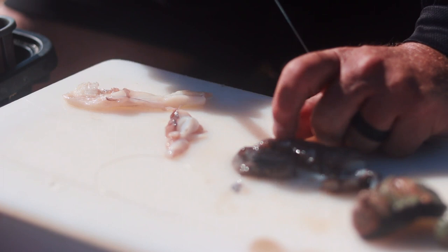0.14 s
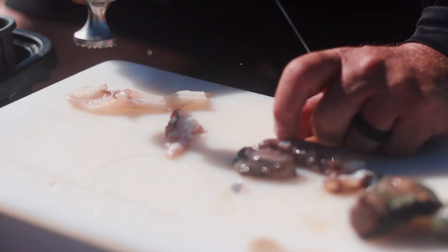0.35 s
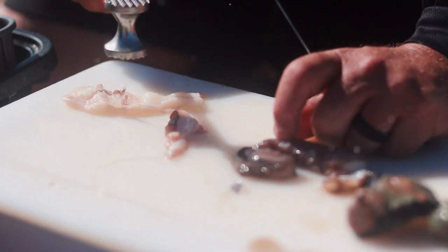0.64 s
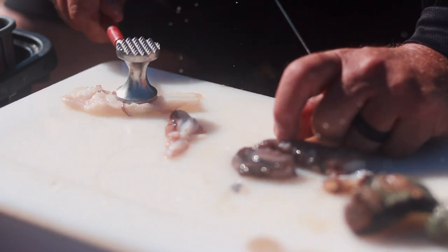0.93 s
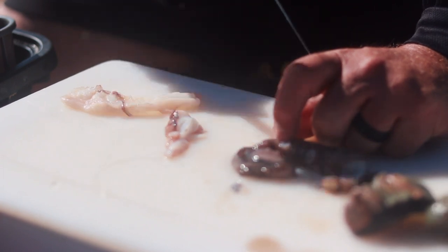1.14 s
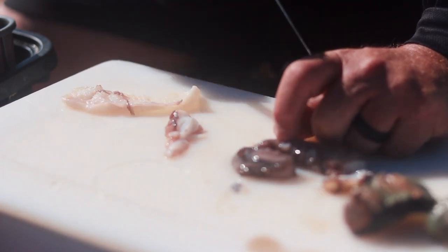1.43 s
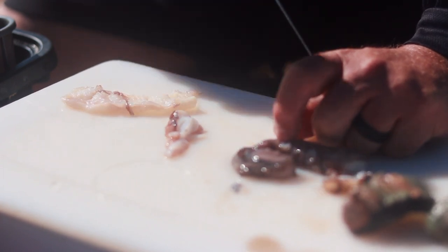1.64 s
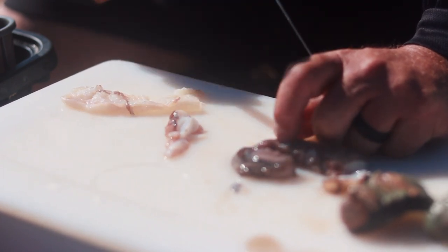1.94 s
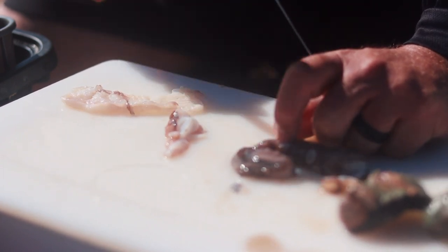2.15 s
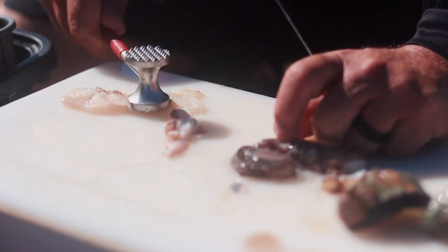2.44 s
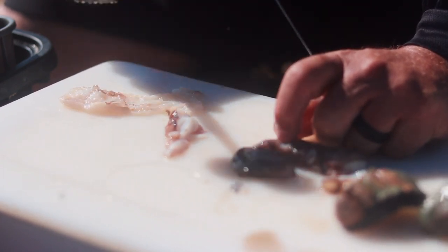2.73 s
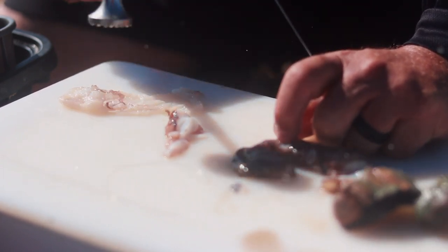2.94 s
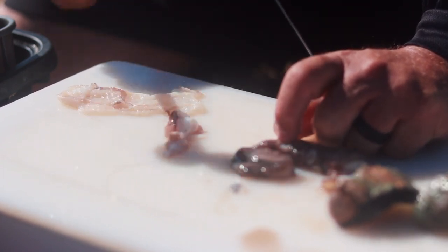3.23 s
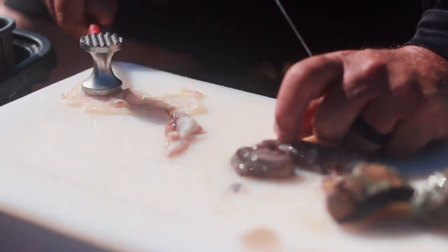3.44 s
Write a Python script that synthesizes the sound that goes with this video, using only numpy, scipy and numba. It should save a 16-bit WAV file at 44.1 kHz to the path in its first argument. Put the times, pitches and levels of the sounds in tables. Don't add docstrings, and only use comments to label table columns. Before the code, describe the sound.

A metal mallet raps wet bait on a plastic board in quick, sharp knocks amid buffeting wind

```python
import sys
import numpy as np
from scipy import signal
from scipy.io import wavfile
from scipy.ndimage import uniform_filter1d
from numba import njit

SR = 44100
rng = np.random.default_rng(int(sys.argv[2]) if len(sys.argv) > 2 else 0)


def persist_wave(psi):
    counts = np.round(np.clip(psi, -1, 1) * 32767).astype(np.int16)
    wavfile.write(sys.argv[1], SR, np.atleast_2d(counts).T)


def field_ratio(decibels):
    return 10 ** (np.asarray(decibels, dtype=float) / 20)


N = 158760


def band(x, hz, width):
    return signal.lfilter(*signal.iirpeak(hz, hz / width, fs=SR), x)


def lowcut(x, hz, order):
    return signal.sosfilt(signal.butter(order, hz, "high", fs=SR, output="sos"), x)


def unit(x):
    return x / np.sqrt(np.mean(x ** 2))


def walk(rate):
    k = int(SR / rate)
    held = np.repeat(rng.standard_normal(N // k + 1), k)
    return 0.72 * uniform_filter1d(uniform_filter1d(held, k), k)[:N]


def ring(modes, luck, t):
    spot_db, spot_detune = 1.5, 0.04
    hz, left, right, t60 = np.array(modes).T[:, :, None]
    size = field_ratio(np.array([left, right]) + spot_db * luck[:len(hz), None])
    pitch_hz = hz * (1 + spot_detune * luck[-len(hz):, None])
    wave = np.sin(2 * np.pi * pitch_hz * t) * np.exp(-np.log(1000) * t / t60)
    return (size * wave).sum(axis=1) / np.sqrt(len(hz))


def excite(modes, force):
    return signal.fftconvolve(modes, force[None], axes=1)[:, :modes.shape[1]]


def scrape(noise, length_s, t):
    return noise * t / length_s * np.exp(-t / length_s) / np.sqrt(length_s * SR / 4)


def add(out, sound, s):
    i = int(s * SR)
    out[..., i:i + sound.shape[-1]] += sound[..., :N - i]


def teeth_ticks(out, t):
    # start_s, head_db, board_db, board_tilt_db per octave
    landings = [(0.2344, 6, 5, -1), (0.2364, 9.5, 7.5, 5.5), (0.5621, 4, -2, -11), (.5636, 6.5, 8, 7),
                (0.8864, 8, 8.5, 7.5), (0.8883, 15.5, 8, -9.1), (1.2022, -25, -21, 14),
                (1.2035, -2, -9, -6), (1.205, 4.5, 2.5, -1), (1.2068, -14, 0.5, -16.5),
                (1.5035, -4.5, -13.5, -4), (1.505, -14, -5, -17), (1.508, -19, -1, -10),
                (1.7499, 4, -1.5, 4.5), (1.7513, -5, -2, -4), (1.7537, -5.5, -4.5, -11),
                (1.9905, -29, -7, -11.5), (1.9921, 3, -4.5, 8), (1.996, 2.5, -2, 5),
                (1.9958, -8, 5.5, -1.5), (2.2074, 3.5, 6.5, 5), (2.211, -1, 2.5, -2.5),
                (2.2117, -4, 8.5, -3.5), (2.4259, 1, 0.5, 1.5), (2.428, 4.5, 8.5, 5.5), (2.4305, 1, 4, .1),
                (2.6327, 7, 4.5, -3.3), (2.6344, 12.5, 15.5, 0), (2.8413, 11.5, 6, -4),
                (2.8423, 0.5, 9, 2.5), (2.8441, 3.5, 6, 0), (3.0485, 0, 3.5, 0.5),
                (3.0508, 20.5, 2.5, -8.5), (3.2588, -9, -17, 12), (3.2602, 12.5, 12.5, 5.5),
                (3.4639, -7, -2, 0), (3.4658, 10.5, 12.5, 2)]
    # pitch_hz, left_db, right_db, t60_s
    head_modes = [(6960, -24.5, -8, 0.0041), (7660, -2.5, 7.5, 0.0062), (8415, -1, 1, 0.0053),
                  (9660, 2.5, -1, 0.0053), (10930, -3.5, 0.5, 0.0065), (12300, -16.5, -12, 0.0022),
                  (14600, -24.5, -18.5, .003)]
    # pitch_hz, left_db, right_db, t60_s
    board_modes = [(849, -4, -5.5, 0.041), (1032, -7, -4, 0.053), (1292, -10.5, -6, 0.047),
                   (1443, -0.5, 0, 0.037), (1630, -18.5, -6.5, 0.037), (1972, -19.5, 0.5, 0.023),
                   (2224, -4.5, 2, 0.028), (2487, -6.5, -1, 0.019), (2810, -13, 3, 0.021),
                   (3140, -7.5, 0, 0.016), (3455, -13, -4, 0.02), (4050, -27, -13, 0.014),
                   (4390, -29.5, -14.5, 0.025)]
    tick_s, grind_s, grind_db = 0.00018, 0.0014, -12
    squash_s = 0.00025
    port_lag = 1
    luck = rng.standard_normal((len(landings), 2, 28))
    grit = rng.standard_normal((len(landings), 3, len(t)))
    for (s, head_db, board_db, tilt_db), a, g in zip(landings, luck, grit):
        head = ring(head_modes, 1.05 * a[0], t)
        head = np.array([head[0], np.roll(head[1], port_lag)])
        teeth = scrape(g[0], tick_s, t) + field_ratio(grind_db) * scrape(g[1], grind_s, t)
        tilted = []
        for hz, left, right, t60 in board_modes:
            tilt = tilt_db * np.log2(hz / 2000)
            tilted.append((hz, left + tilt, right + tilt, t60))
        board = excite(ring(tilted, a[1], t), scrape(g[2], squash_s, t))
        add(out, field_ratio(head_db) * excite(head, teeth) + field_ratio(board_db) * board, s)


def thuds_and_slaps(out, t):
    # start_s, thud_db, slap_db
    blows = [(0.2339, -6, -2.5), (0.5623, 1.5, -8), (0.8863, 1.5, 5), (1.2018, -2, -6), (1.5023, -1, -12),
             (1.7504, 2.5, -6.5), (1.9921, 1, 1), (2.208, -5.5, -3), (2.4252, -3, -5), (2.6333, -4.5, 1.5),
             (2.8407, -0.5, 2), (3.0501, -1, 5.5), (3.2593, 1, -1.5), (3.4652, -15.5, -6)]
    # pitch_hz, left_db, right_db, t60_s
    thud_modes = [(370, -8, -7, 0.086), (448.8, -0.5, -3.5, 0.1), (226, -24.5, -34, 0.014),
                  (640, -6.5, -5.5, 0.083)]
    push_s = 0.0012
    rebound_s, slap_t60_s, slap_hz, slap_width_hz = 0.0017, 0.024, 1430, 1500
    spot = rng.standard_normal((len(blows), 8))
    wet = rng.standard_normal((len(blows), 3, len(t)))
    push = np.sin(np.pi * np.clip(t / push_s, 0, 1)) * np.pi / (push_s * SR)
    slap_shape = 2 * np.minimum(t / rebound_s, 1) * np.exp(-np.log(1000) * t / slap_t60_s)
    for (s, thud_db, slap_db), a, g in zip(blows, spot, wet):
        add(out, field_ratio(thud_db) * excite(ring(thud_modes, 0.28 * a, t), push), s)
        noise = g[0] + 1.1 * g[1:]
        slap = band(band(noise, slap_hz, slap_width_hz), slap_hz, 2 * slap_width_hz)
        add(out, field_ratio(slap_db) * slap * slap_shape, s)


def mallet():
    out, t = np.zeros((2, N)), np.arange(4096) / SR
    teeth_ticks(out, t)
    thuds_and_slaps(out, t)
    return lowcut(out, 150, order=2)


def buffet(gusts, pops):
    # pitch_hz, width_hz, level_db
    port_modes = [(117.6, 310, -19.5), (251, 208, -5.5), (363, 210, -3.5), (597, 450, -16),
                  (1135, 230, -13), (2100, 730, -36.5)]
    calm_db, eddies_per_s, eddy_spread_db = -36, 420, 3.5
    pop_db, pop_cycles = -3, 1.29
    t, out = np.arange(N) / SR, 0
    power = field_ratio(2 * calm_db)
    for s, length, db in gusts:
        power = power + field_ratio(2 * db) * np.exp(-(2 * (t - s) / length) ** 2)
    arrivals = rng.random(N) < eddies_per_s / SR
    strength = field_ratio(eddy_spread_db * np.minimum(rng.exponential(size=N), 2.6))
    hits = arrivals * strength * rng.choice([-1, 1], size=N)
    for hz, width, db in port_modes:
        own = hits * field_ratio(1.8 * rng.standard_normal(N))
        out = out + field_ratio(db) * unit(band(band(own, hz, width), hz, 1.51 * width))
    out = unit(out) * np.sqrt(power)
    u = (np.arange(2048) - 1024) / SR
    for s, db, hz in pops:
        pulse = np.cos(2 * np.pi * hz * u) * np.exp(-(2 * u * hz / pop_cycles) ** 2)
        add(out, -field_ratio(db + pop_db) * pulse, s + u[0])
    return out


def wind():
    # centre_s, length_s, level_db
    gusts_left = [(.07, 0.045, -27.5), (.2, 0.079, -23.5), (.45, 0.12, -42), (.53, 0.13, -24),
                  (.78, 0.28, -28.5), (1.1, 0.14, -59), (1.6, 0.3, -27.5), (1.73, 0.048, -25.5),
                  (1.86, 0.053, -35), (2.05, 0.078, -24), (2.3, 0.087, -26), (2.67, 0.031, -20),
                  (2.9, 0.037, -20), (3.1, .06, -37), (3.34, 0.037, -24.5), (3.58, 0.051, -21)]
    gusts_right = [(.025, 0.05, -24.5), (.17, 0.11, -29), (.41, 0.017, -29.5), (.53, 0.078, -19.5),
                   (.71, 0.014, -25), (.8, 0.038, -12.5), (.86, 0.25, -15.5), (.96, 0.018, -34),
                   (1.03, 0.011, -11), (1.17, 0.05, -25.5), (1.35, 0.074, -27.5), (1.62, 0.058, -25),
                   (1.72, 0.041, -17.5), (1.8, 0.14, -19.5), (1.94, 0.059, -16.5), (2.06, 0.08, -13.5),
                   (2.17, 0.034, -17.5), (2.27, 0.067, -24.5), (2.37, 0.11, -26), (2.47, 0.048, -15),
                   (2.59, 0.14, -28), (2.74, 0.12, -15.5), (2.92, 0.077, -13), (3.16, 0.046, -14.5),
                   (3.35, 0.073, -18.5), (3.57, 0.2, -24.5)]
    # centre_s, peak_db,
    # pitch_hz
    pops_left = [(1.457, -19.5, 111), (1.516, -6, 600), (1.467, -7.5, 320), (1.7383, -9, 423),
                 (2.016, -4, 566), (2.2523, -5, 420), (2.7939, -13, 510), (2.8849, -12, 542),
                 (2.9075, -12, 454), (3.073, -3, 560), (3.1274, -5, 370), (3.4854, 2.5, 544),
                 (3.554, -8, 434), (3.5965, -3, 580)]
    pops_right = [(0.48, -10, 322), (0.4881, -8, 254), (0.5206, -17, 410), (0.525, -7, 520),
                  (0.5355, -1.5, 390), (0.543, -2.5, 790), (0.554, -6, 410), (0.514, -19, 101),
                  (1.516, -4, 600), (.764, -10, 395), (1.547, -2.5, 690), (1.926, -9, 585),
                  (1.945, -8, 560), (1.977, -5.5, 800), (0.7877, 0, 620), (0.8016, -2.5, 410),
                  (0.813, -7, 428), (0.823, -6, 544), (0.834, 0.5, 1000), (1.708, -11, 400),
                  (1.7767, 2.5, 495), (1.7853, -6, 500), (1.9193, -2, 820), (1.9388, -3, 790),
                  (1.958, -7, 536), (1.9848, -4, 483), (2.038, -3, 630), (2.0621, 5.5, 483),
                  (2.0743, 1.5, 600), (2.0929, -2.5, 730), (2.47, 1, 543), (2.7281, -3, 636),
                  (2.894, 1, 656), (2.9334, 1, 510), (3.1396, 1, 1094), (3.1668, 4.5, 515),
                  (3.1777, 1, 510), (3.248, -4.5, 1170)]
    ports = np.array([buffet(gusts_left, pops_left), buffet(gusts_right, pops_right)])
    return ports + 0.15 * ports[::-1]


def harbour():
    # pitch_hz, level_db per Hz
    spectrum = np.array([(60, -6.5), (300, 2), (600, 4), (1400, 0.5), (3000, -6.5), (4600, -20.5),
                         (10000, -14), (16000, -50)])
    alike_hz, treble_pan_db = 940, -4
    out = 0
    for hz in 60 * 2 ** np.arange(0, 8.2, 0.5):
        noise = rng.standard_normal((2, N))
        mid, side = band(band(noise, hz, hz / 1.56), hz, hz / 1.54)
        db = np.interp(np.log(hz), np.log(spectrum[:, 0]), spectrum[:, 1]) + 0.65 * walk(8.6)
        wide = min(hz / alike_hz, 1.2)
        pan = field_ratio(treble_pan_db * min(hz / 5300, 2) * np.array([[0.5], [-0.5]]))
        stereo = (mid + wide * side * np.array([[1], [-1]])) / np.sqrt(1 + wide ** 2)
        out = out + field_ratio(db) * pan * stereo
    return unit(out) * field_ratio(-31)


def drone():
    hum_hz, width_hz, hum_db = 396, 3, -31.5
    middle_s, half_s = 1.9, 0.5
    swell = np.exp(-((np.arange(N) / SR - middle_s) / half_s) ** 4)
    hum = unit(band(band(rng.standard_normal(N), hum_hz, width_hz), hum_hz, 2 * width_hz))
    return field_ratio(hum_db + np.array([[0], [-3.0]])) * swell * hum


def scene():
    return mallet() + wind() + harbour() + drone()


@njit
def duck(want_db, start_db, attack, hold, rise_db):
    out, g, wait = np.empty(len(want_db)), start_db, 0.
    for i in range(len(want_db)):
        if want_db[i] < g:
            g += (want_db[i] - g) * attack
            wait = hold
        elif wait > 0:
            wait -= 1
        else:
            g = min(g + rise_db, 0.)
        out[i] = g
    return out


def band_limit(x):
    return signal.sosfilt(signal.butter(12, 16450, fs=SR, output="sos"), x)


def record(dry):
    limit_db, overdo, start_duck_db = -14, 1.318, -9.0
    sense_s, attack_s, hold_s, recover_db_per_s = 0.0073, 0.0043, 0.022, 125
    k = 1 / (sense_s * SR)
    power = signal.lfilter([k], [1, k - 1], (dry ** 2).max(axis=0))
    level_db = 10 * np.log10(power + 1e-12)
    want_db = overdo * np.minimum(limit_db - level_db, 0)
    gain_db = duck(want_db, start_duck_db, 1 / (attack_s * SR), hold_s * SR, recover_db_per_s / SR)
    x = np.clip(dry * field_ratio(gain_db), -1, 1)
    x = np.clip(lowcut(x, 60, order=1), -1, 1)
    x = signal.sosfiltfilt(signal.ellip(6, 0.1, 40, 15850, fs=SR, output="sos"), x)
    return band_limit(x)


dry = scene()
out = record(dry)
persist_wave(out)
```